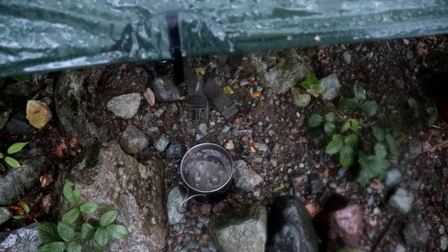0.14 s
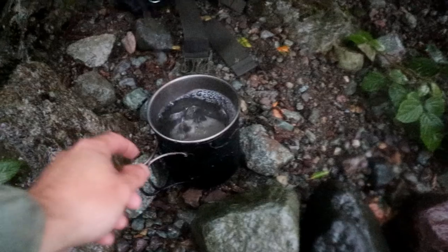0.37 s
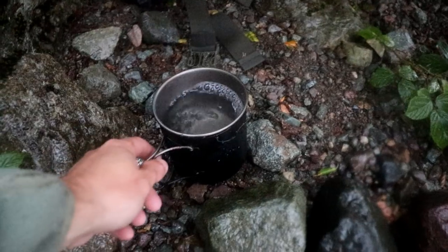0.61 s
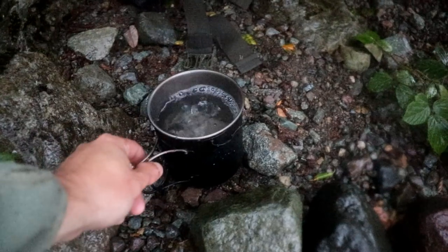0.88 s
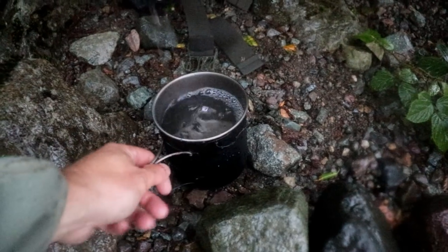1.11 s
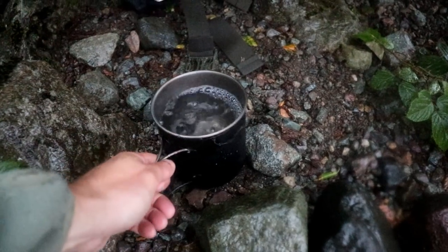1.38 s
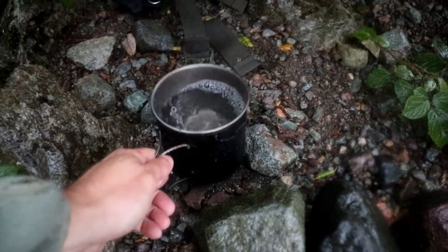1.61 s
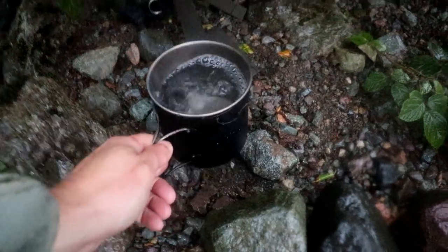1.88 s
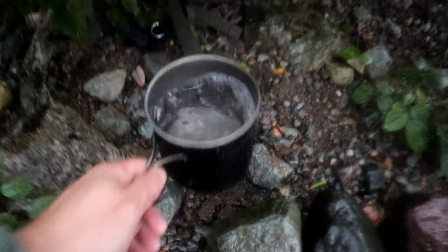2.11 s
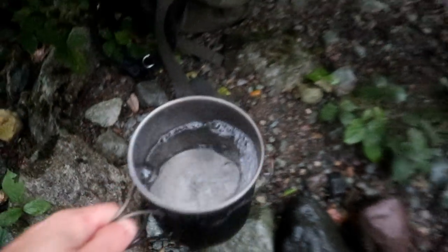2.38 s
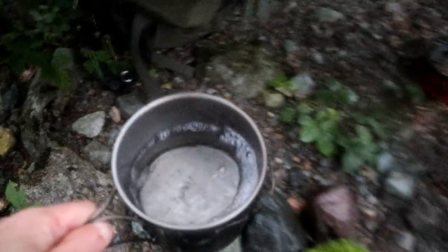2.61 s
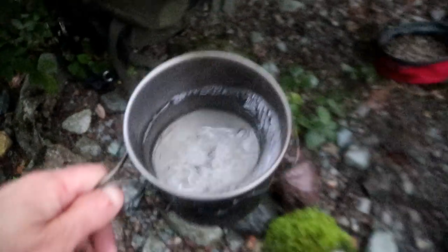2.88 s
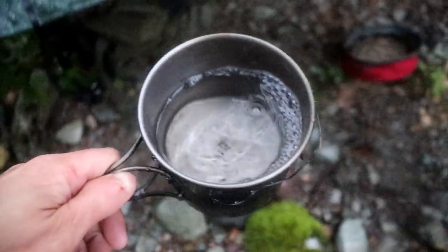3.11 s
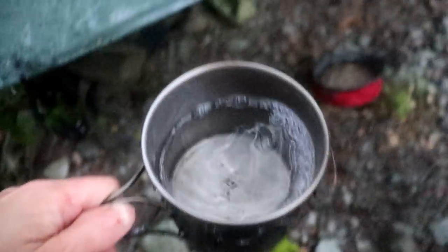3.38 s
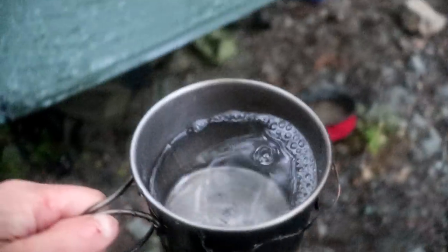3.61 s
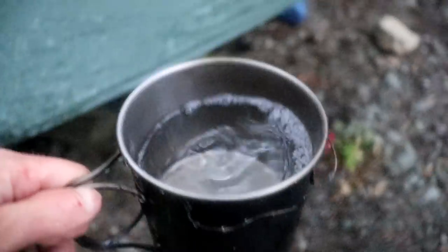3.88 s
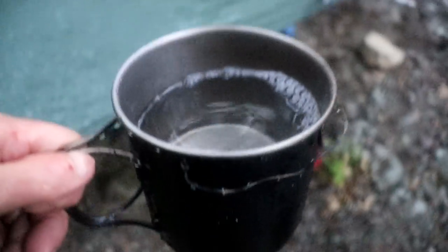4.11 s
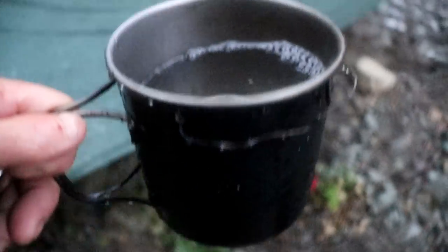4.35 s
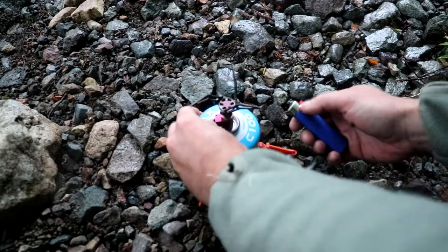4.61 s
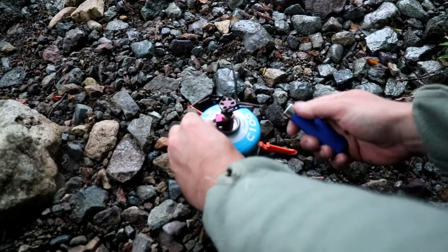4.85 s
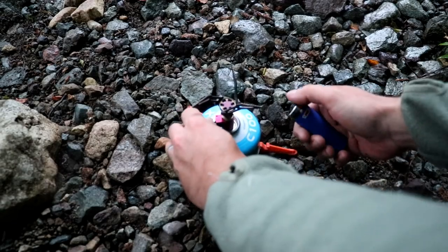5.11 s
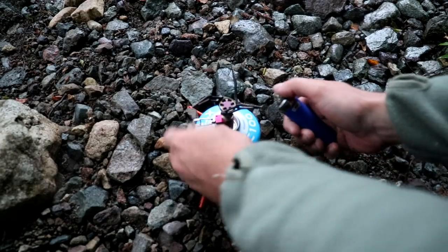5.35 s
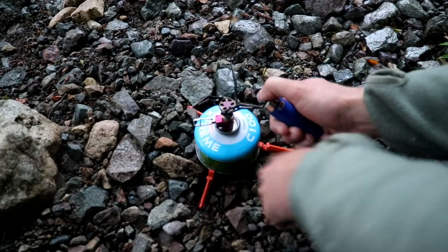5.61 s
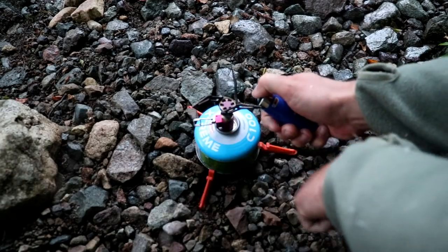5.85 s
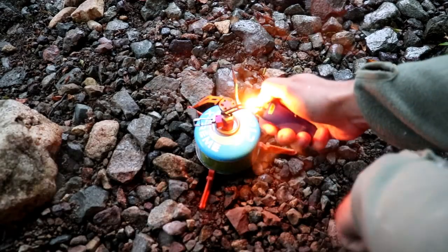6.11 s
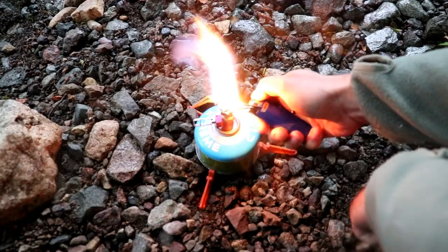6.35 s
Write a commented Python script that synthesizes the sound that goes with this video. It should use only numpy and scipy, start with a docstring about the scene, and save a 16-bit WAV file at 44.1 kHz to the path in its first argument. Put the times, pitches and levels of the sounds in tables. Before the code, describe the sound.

Outdoors, dry and close to a single microphone: dense rain patter over a soft rush, dull sheet thumps, crisp slaps and bright ticks, with faint rim notes from a water-filled pot. Then a sudden cut to a calmer place with only sparse drops. A camping burner begins a high, steady hiss, a lighter rasps once, and ignition lands as a deep puff followed by a low flame rush.

```python
"""Close under a tarp in steady rain: a rush of far patter, air rumbling low, wind on the one microphone.
Fat drops slap the fabric overhead, small ones tick on hard ground; bubbles and rim notes come from a pot.
Then a quieter spot, the rain further off: at 5 s a gas valve opens, whistling and hissing through a burner;
at 6 s a lighter wheel scrapes, and near 6.4 s the gas pops alight and roars.
Rush and hiss are shaped noise, drops are noise bursts through resonances, bubbles are gliding sines."""
import sys
import numpy as np
from scipy import signal
from scipy.fft import rfft, irfft, next_fast_len
from scipy.io import wavfile
from scipy.ndimage import uniform_filter1d, map_coordinates

SR = 44100
rng = np.random.default_rng(int(sys.argv[2]) if len(sys.argv) > 2 else 0)


def volts_from_db(level):
    """Convert decibel levels to linear amplitude ratios."""
    exponent = np.asarray(level, float) / 20
    return 10 ** exponent


def transcribe(u):
    """Save the signal u as a 16-bit wav file named by the first command-line argument.

    u: samples, shape (n,) or (channels, n), limited to [-1, 1]; the rate is SR.
    q: integer samples, one column per channel.
    """
    v = np.clip(np.atleast_2d(u).T, -1, 1)
    q = np.round(v * 32767).astype(np.int16)
    wavfile.write(sys.argv[1], SR, q)


N = 285768  # samples, 6.48 s

# All spectra below are relative: each noise is brought to rms 1 before its level is set.
# steady rain, close under the tarp and then further off at the stove: time_s, level_db
RAIN_LEVEL = [(0, -39.5), (2.6, -39), (3.5, -38.5), (3.96, -35.5), (4.53, -39), (4.55, -52), (4.62, -48),
              (5.05, -49)]
# colour of the far rain: frequency_hz, density_db_per_hz
PATTER_SPECTRUM = [(59, -59), (100, -3.5), (163, -21), (502, 3.5), (621, -3), (1360, -2), (2000, -6.5),
                   (6290, -8), (13200, -22.5), (16000, -34)]
# slow air moving past the tarp: time_s, level_db
AIR_LEVEL = [(0, -49), (.45, -47.5), (.67, -33), (.96, -53), (1.36, -45), (1.77, -52), (2.2, -44.5),
             (2.86, -41), (3.15, -48), (3.9, -41), (4.3, -41), (4.53, -49), (4.62, -69), (5.05, -83)]
# colour of that air: frequency_hz, density_db_per_hz
RUMBLE_SPECTRUM = [(15, -29), (26, 4), (45, -4), (65, -31), (90, -58)]
# gusts on the microphone: peak_s, level_db, rise_s, hold_s
WIND_GUSTS = [(0.602, -48, .1, 0.062), (1.07, -33, .06, 0.016), (1.494, -48, 0.14, 0.23),
              (2.375, -40, .02, 0.43), (2.865, -33.5, 0.066, 0.056), (3.002, -43, .05, .06)]
# colour of the gusts: frequency_hz, density_db_per_hz
BUFFET_SPECTRUM = [(30, -8), (60, -4.5), (125, -4.5), (220, -8.5), (360, -42), (700, -51)]
# fat drops on the tarp, levels are energies: start_s, thump_db, slap_db, spray_db, spread_ms
FAT_DROPS = [(.017, -3, -2.5, -12, 2.4), (0.0428, -29, 0, -12, 0.61), (.1963, -18, -22, -21, 1.1),
             (0.216, -35, -14, -17, 1.6), (.261, -27, -7, -11, 1.5), (.3053, -28, -10, -23, 2.6),
             (0.3173, -8.5, -14, -11, 4.2), (0.4571, -9, -7, -24, 2.4), (.464, -10, -4, -21, 2.6),
             (0.4888, -5, -2.5, -7, 3.7), (0.4981, -6, -1, -20, 3.3), (0.5418, -2.5, -0.5, -11, 3.5),
             (0.5732, -5, -3, -0.5, 2.7), (0.6187, -24, -3.5, -29, 1.9), (0.6579, -3, -0.5, -7, 4),
             (.666, -24, -22, -5.5, 5.7), (0.6831, 5.5, 2.5, -7, 4.4), (0.7728, -14, -8, -18, 3.6),
             (0.8366, -10, -19, -15, 5.4), (0.935, 5, 5, -1, 0.46), (.9836, -14, -12, -8, 3.3),
             (1.0853, -20, -2, -9, 4.4), (1.0975, 0, 9, 1.5, 1.3), (1.128, -18, -3, -14, 2.8),
             (1.1351, -4, -5, -3.5, 4.2), (1.142, -15, -6, -9, 5.7), (1.1745, 10, 5, 8.5, 2.5),
             (1.208, -2.5, 7, -1.5, 2.9), (1.215, -12, -15, -12, 2.5), (1.3112, -8, -13, -8, 2.6),
             (1.3388, -5.5, -1.5, -6, 3.8), (1.357, -11, -1.5, -10, 1.6), (1.3908, -6, -24, -10, 1.9),
             (1.439, -6, 0, -1, 1.2), (1.4739, 7, 2, 2.5, 3.2), (1.491, -13, -24, -16, 1.4),
             (1.5284, -2, 0, -1.5, 3.5), (1.5443, 1.5, -8, -4, 2.7), (1.5693, -3, -2, -2.5, 4.9),
             (1.5981, -6, -5, -15, 4.4), (1.659, -12, -9, -14, 4.2), (1.7218, -23, -5, -5, 4.8),
             (1.7274, 2.5, 3.5, -2, 2), (1.781, -12, -10, -12, 2.8), (1.814, -6, -2.5, -8, 2.1),
             (1.821, 12, 6, 8, 1.9), (1.9088, -1, -3.5, -26, 0.87), (1.9946, -8.5, -8, -8.5, 3.1),
             (2.0198, -1, -3, -20, 1.7), (2.029, -12, -4, -10, 2.4), (2.129, 4, -0.5, 2, 0.9),
             (2.1544, -28, -6, -5, 1.3), (2.1738, -22, -6, -10, 2.1), (2.187, -1, 0, -3.5, 2.8),
             (2.1968, -12, -2, -10, 5.6), (2.2082, -5, -2, -6, 4.6), (2.228, 2, 5.5, 0.5, 2.7),
             (2.2385, -19, -6, -8, 5.1), (2.3462, -8.5, -8, -13, 2.2), (2.4977, -27, -9, -14, 6.9),
             (2.5436, -27, -9.5, -26, 1.8), (2.6135, -30, -11, -23, 3.4), (2.6631, -7.5, -5.5, -2.5, 3.2),
             (2.722, -7, -9.5, -7, 4.2), (2.7983, -7, 6, -2, 3.1), (2.8408, -5, -15, -8, 2.6),
             (2.8736, -21, -4, -15, 0.58), (2.89, -0.5, -3.5, -7, 5), (2.911, -2, -2, -5, 2.7),
             (2.9314, -22, -2, -7, 2), (2.9385, -12, -12, -6, .8), (2.957, -4.5, -9, -4, 0.97),
             (2.9854, -12, -13, -28, 3), (3.1151, -7, -10, -9, 2.9), (3.2, -12, -7, -13, 2.6),
             (3.2362, -23, -11, -13, 1.1), (3.265, -12, -12, -11, 2.6), (3.2725, -12, -6.5, -9, 2.5),
             (3.2996, -24, -5.5, -20, 1.3), (3.3253, -7, -9, -26, 1.2), (3.3777, -32, -5.5, -12, 1),
             (3.397, -20, -11, -16, 1.7), (3.4125, -10, -2.5, -11, 5), (3.4488, -18, -9, -13, 2.8),
             (3.4813, -14, -9, -14, 4.8), (3.505, -7, -9, -14, 3.8), (3.517, -15, -10, -7.5, 1),
             (3.5974, -18, -10.5, -21, 4.1), (3.708, 8, -2.5, -2.5, 2.3), (3.7535, -19, -13, -15, 3.5),
             (3.7672, -23, -7, -17, 2.7), (3.787, -5, -3, -9, 3.9), (3.7963, 2, 4.5, 2.5, 0.77),
             (3.8724, -30, -5, -12, 2.5), (3.8923, 7.5, 9.5, 2, 2.4), (3.9335, 1.5, 6.5, -2.5, 2),
             (3.9546, -8, -13, -8, 2.5), (3.9628, -11, -6, -16, 2.4), (3.9873, -29, -8, -11, 2.6),
             (4.0125, -3.5, -4, -11, 1.6), (4.0811, 0.5, -20, -1.5, 1.8), (4.087, -6, -2, -8, 4.4),
             (4.1024, -24, -8, -23, 1.7), (4.157, -23, -2.5, -2.5, 1.9), (4.164, -18, -6, -6, 2.5),
             (4.221, -29, -9, -10, 2.3), (4.2291, -2.5, 3, 0.5, 2.4), (4.2971, -6.5, -11, -20, 3.6),
             (4.3101, -20, -7, -16, 2.7), (4.3247, -5.5, -4, -7, 2), (4.3595, -17, -7, -12, 3.2),
             (4.381, -26, -10, -16, 2), (4.4204, -2, -7.5, -18, 1.4), (4.44, -11, -10, -23, 1.8),
             (4.453, -4.5, -8, -15, 4.8), (4.483, -16, -10, -11, 3.4), (4.4986, 3.5, 1.5, 2.5, 2.4),
             (4.531, 10.5, 3.5, 1, 1.2), (4.5865, -14, -17, -25, 1.8), (4.6107, -11, -11, -10, 4.1),
             (4.6458, -17, -18, -19, 4.3), (4.5966, -20, -15, -23, 2.5), (4.6596, -17, -18, -31, 3.9),
             (4.83, -16, -21, -33, 1.8), (4.931, -32, -19, -24, 2.5), (4.9907, -21, -19, -26, 1.5),
             (4.8956, -8.5, -10.5, -17, 4.2), (4.981, -11.5, -13, -21, 1.5),
             (5.0687, -7.5, -16, -13.5, 3.8), (5.1247, -14, -9, -23, 2.8), (5.26, -14, -18, -24, 2.5),
             (5.3544, -13, -7, -19, 3), (5.4062, -11, -13, -14, 6.3), (5.6934, -13.5, -10, -17, 4.2),
             (5.7486, -2, -9.5, -9, 2.6), (5.7637, -16, -22, -25, 2.5), (5.869, -11.5, -14, -19, 2.6),
             (6.1808, -13.5, -19, -29, 2.6), (6.2188, -12.5, -19, -28, 2), (6.2524, -14, -19, -23, 1.3),
             (6.359, -12, -12, -7, 2.7)]
# walking along under the tarp, the fabric overhead is slack, then taut; each drop strays from this:
# time_s, sheet_pitch_hz
SHEET_PITCH = [(0, 324), (1.2, 320), (2.2, 313), (2.7, 395), (3.7, 405), (4.5, 352), (5.2, 386),
               (6.48, 412)]
# Resonances of a landing; ring() passes through them twice.
# the whole sheet: centre_in_sheet_pitches, width_in_sheet_pitches, one_pass_level_db
THUMP_MODES = [(0.497, 0.48, 0.5), (1.4, 0.74, 1.5)]
# the struck patch, before random tuning: centre_hz, width_hz, one_pass_level_db
SLAP_MODES = [(814, 1010, 4.5), (2170, 3170, 0.5)]
# the bursting drop, before random tuning: centre_hz, width_hz, one_pass_level_db
SPRAY_MODES = [(3000, 3000, 0), (6300, 4000, -1), (12000, 4000, -7)]
# small drops ticking on stone, leaf and metal (tick() shortens the spread a little):
# start_s, pitch_hz, energy_db, spread_ms
GROUND_TICKS = [(.236, 8660, -16, 1.1), (0.2672, 13150, -2.5, .5), (0.4955, 12900, -14, .8),
                (0.535, 8950, -12, 2.3), (.6378, 8400, -15, 1), (.6676, 8500, -9, 1.6),
                (.8034, 8600, -11, 0.98), (.9149, 8800, -9, 1.2), (0.9165, 5720, 2, 4.4),
                (.9554, 5500, -9.5, 1.6), (.967, 9360, -12, 1.2), (1.063, 8300, -10, 2.2),
                (1.1216, 6400, -12, 1), (1.2786, 6100, -8, .6), (1.664, 8550, -14, 1.8),
                (1.7676, 5400, -7.5, .7), (1.4755, 6800, -1, 1.8), (1.8199, 7140, 2.5, 1.9),
                (1.9007, 8450, -10.5, 1.5), (2.0709, 5150, -14, 1.8), (2.09, 8850, -14, 1.1),
                (2.1146, 4100, -11, 1.4), (2.174, 7900, -3, 1.3), (2.3002, 9050, -11, 1.3),
                (2.4469, 8100, -14.5, 1.1), (2.6618, 9900, -14, 1.6), (2.7733, 12100, -17, 1.1),
                (2.952, 8100, -12, 0.88), (3.05, 4470, -10, 0.84), (3.093, 8450, -7.5, 1.1),
                (3.2851, 5200, -10, 0.4), (3.2939, 9500, -16, 1.2), (3.7005, 8500, -3.5, 1.1),
                (3.8441, 8600, -13, 1.1), (3.917, 8700, -7, 1.7), (4.0077, 8300, -12, 1.6),
                (4.2044, 4700, -11, 0.52), (4.2852, 4400, -13, 1.4), (4.332, 4480, -11, 1.1),
                (4.5047, 9150, -20, 1.8), (4.5183, 8900, -4, 1.8), (4.6417, 8900, -21, 2)]
# bubbles caught under drops in the pot, one list per bubble: time_s, pitch_hz, level_db
POT_BUBBLES = [
    [(.495, 836, -27), (.507, 880, -35), (.531, 1116, -25), (.555, 1184, -35.5), (.575, 1500, -41)],
    [(1.086, 1225, -17), (1.091, 1030, -15), (1.105, 1060, -25), (1.125, 1148, -31), (1.14, 1410, -35),
     (1.155, 2016, -45)],
    [(1.663, 683, -40), (1.685, 1098, -17), (1.699, 1330, -21.5), (1.717, 1420, -50)],
]
# drops ringing the rim of the pot: start_s, pitch_hz, peak_db before the decay
RIM_NOTES = [(.87, 2700, -36), (1.265, 2700, -34), (3.94, 4800, -35), (4.085, 4800, -42)]
# gas flow: valve opens, steady, the hand comes down with the lighter, the flame takes it:
# time_s, whistle_db before the flame fills the cavity
GAS_LEVEL = [(5.03, -65), (5.065, -47.5), (5.1, -51), (5.165, -32), (5.26, -28.5), (5.98, -29),
             (6.002, -38.5), (6.07, -30), (6.2, -32), (6.385, -36.5), (6.393, -43), (6.48, -41)]
# pitch of the valve cavity: time_s, pitch_hz
WHISTLE_PITCH = [(5.03, 5670), (5.13, 5560), (5.2, 5180), (5.95, 5084), (6.0, 5020), (6.48, 4920)]
# whistle of the open burner: hz_from_centre, density_db_per_hz
OPEN_WHISTLE = [(5, -2), (250, 2), (550, -5.5), (1000, -15), (1500, -43)]
# whistle with the hand beside it: hz_from_centre, density_db_per_hz
HAND_WHISTLE = [(5, -7), (150, 1.5), (400, -11), (800, -9), (1500, -34)]
# rush through the burner holes: frequency_hz, density_db_per_hz
JET_SPECTRUM = [(900, -7), (1500, -7), (2100, -0.5), (2750, 1.5), (3100, 0), (3700, -6), (4500, -1),
                (6300, -1), (7900, 2), (9200, -1.5), (10500, -11), (13000, -39.5)]
# the highest band of the gas hiss: frequency_hz, density_db_per_hz
TOP_HISS_SPECTRUM = [(9000, -31), (10600, -3), (11500, 2), (12100, 6), (12800, 0), (14000, -9),
                     (15800, -19)]
# the lighter wheel scrapes: time_s, level_db
FLINT_LEVEL = [(5.98, -42), (5.985, -20.5), (5.992, -20), (5.996, -50)]
# colour of the scrape: frequency_hz, density_db_per_hz
SCRAPE_SPECTRUM = [(300, -13), (1500, -15), (3000, -9), (4600, 7), (6000, -5), (9000, -6), (12500, -7),
                   (16000, -14)]
# the burning gas: time_s, level_db
FLAME_LEVEL = [(6.378, -64), (6.386, -24), (6.392, -20.5), (6.398, -25.5), (6.41, -24.5), (6.48, -23.5)]
# colour of the flame: frequency_hz, density_db_per_hz
ROAR_SPECTRUM = [(24, -50), (40, -24), (280, 1), (700, -7), (1000, -2), (1400, -10), (1750, -20),
                 (2500, -24), (3500, -38), (5000, -70)]


def unit(x):
    """Scaled to rms 1."""
    return x / np.sqrt(np.mean(x ** 2) + 1e-20)


def curves(rows, outside=None):
    """One value per sample for each column after the time."""
    s, *cols = np.transpose(rows)
    return [np.interp(np.arange(N) / SR, s, c, outside, outside) for c in cols]


def wobble(rate):
    """A smooth random curve, rate knots a second."""
    knots = rng.standard_normal(int(N * rate / SR) + 4)
    return map_coordinates(knots, [np.arange(N) * rate / SR])


def filtered(x, response):
    """x times a complex response of frequency."""
    size = next_fast_len(N + 8192)
    return irfft(rfft(x, size) * response(np.fft.rfftfreq(size, 1 / SR)), size)[:N]


def coloured(x, spectrum):
    """x shaped by (Hz, dB) points on a log frequency axis, at rms 1."""
    f, db = np.transpose(spectrum)
    return unit(filtered(x, lambda hz: volts_from_db(np.interp(np.log(hz + 1), np.log(f), db, -120, -120))))


def rush(spectrum, patchy_db):
    """Coloured noise whose gain varies in random patches of time and frequency."""
    z = signal.stft(rng.standard_normal(N + 512), nperseg=512)[2]
    field = uniform_filter1d(rng.standard_normal(z.shape), size=6, axis=0)
    field = uniform_filter1d(field, size=10, axis=1)
    patchy = signal.istft(z * volts_from_db(patchy_db * unit(field)), nperseg=512)[1][:N]
    return coloured(patchy, spectrum)


def rain_rush():
    """Far rain melts into a rush: patchy noise whose level flickers."""
    level_db = curves(RAIN_LEVEL)[0] + 0.8 * wobble(3) + 0.9 * wobble(15)
    return volts_from_db(level_db) * rush(PATTER_SPECTRUM, patchy_db=1.8)


def air_rumble():
    """Slow air moving past the tarp rumbles as deep noise."""
    level_db = curves(AIR_LEVEL)[0] + 1.1 * wobble(4.8)
    return volts_from_db(level_db) * rush(RUMBLE_SPECTRUM, patchy_db=2.7)


def gusts():
    """Each gust swells, holds and drops away over a constant calm."""
    fall_s, calm_db = 0.041, -66.5
    t = np.arange(N) / SR
    each = []
    for peak_s, db, rise_s, hold_s in WIND_GUSTS:
        rise = np.minimum(t - peak_s, 0) / rise_s
        fall = np.maximum(t - peak_s - hold_s, 0) / fall_s
        each.append(volts_from_db(db) * np.exp(rise - fall))
    return volts_from_db(calm_db) + np.max(each, axis=0)


def wind_buffet():
    """Wind buffets the microphone: low noise follows the gusts and flutters."""
    return gusts() * volts_from_db(2.5 * wobble(30)) * rush(BUFFET_SPECTRUM, patchy_db=2.0)


def resonances(f, modes):
    """Causal response of (centre, width, dB) resonances, alternating in sign."""
    total = 0
    for k, (centre, width, db) in enumerate(modes):
        damping = 1j * f * width
        total = total + (-1) ** k * volts_from_db(db) * damping / (centre * centre - f * f + damping)
    return total


def bursts(spread_ms, spiky, strike):
    """Spectra of landings: a sharp first strike, then ragged splashes that thin out."""
    t = np.arange(700) / SR
    spread_s = np.clip(spread_ms, 0.2, 8)[:, None] / 1000
    ragged = uniform_filter1d(rng.standard_normal((len(spread_s), len(t))), size=24, axis=1)
    noise = rng.standard_normal(ragged.shape) * np.exp(spiky * unit(ragged))
    splashes = (1 - np.exp(-t / 0.0004)) * (np.exp(-t / spread_s) + 0.18 * np.exp(-t / 0.0047))
    shape = splashes + strike * np.exp(-t / 0.00013)
    return rfft(noise * shape, 1024)


def ring(spectra, modes, scale, db):
    """Each landing twice through the modes, their pitches times scale, at the given energy."""
    f = np.fft.rfftfreq(1024, 1 / SR) / scale[:, None]
    rows = irfft(spectra * resonances(f, modes) ** 2)
    return volts_from_db(db)[:, None] * rows / np.linalg.norm(rows, axis=1)[:, None]


def laid(s, rows):
    """Rows of sound added at their times."""
    place = np.round(s * SR).astype(int)[:, None] + np.arange(rows.shape[1])
    return np.bincount(place.ravel(), rows.ravel(), N + rows.shape[1])[:N]


def tarp(s, hz, thump_db, slap_db, spray_db, spread_ms, spiky=0.52):
    """One blow drives sheet and patch while the drop sprays; every spot is tuned a little differently."""
    blow = bursts(spread_ms, spiky, strike=1.0)
    # the drop's weight shoves the sheet away at once: -1 is an impulse at first contact
    push = 0.85 * blow / np.abs(blow).mean(axis=1)[:, None] - 1
    burst = bursts(1.2 * spread_ms, spiky, strike=2.5)  # the drop shatters mostly on first contact
    patch_tune, spray_tune = np.exp(0.14 * rng.standard_normal((len(s), 2))).T
    thump = ring(push, THUMP_MODES, hz, thump_db)
    slap = ring(blow, SLAP_MODES, patch_tune, slap_db)
    spray = ring(burst, SPRAY_MODES, spray_tune, spray_db)
    return laid(s, thump + slap + spray)


def tick(s, hz, db, spread_ms):
    """A hard surface answers with one high resonance, the narrower the longer it lasts."""
    width = (0.37 / spread_ms)[:, None]  # as a fraction of hz
    landing = bursts(0.87 * spread_ms, spiky=0.18, strike=0.46)
    return laid(s, ring(landing, [(0.91, width, 0)], hz, db))


def scattered(count, steep_db):
    """Random times with energies that follow the rain: many small, a few big."""
    when, size, spread = rng.random((count, 3)).T
    s = when * (N - 1) / SR
    rain_db = curves(RAIN_LEVEL)[0][(s * SR).astype(int)]
    return s, rain_db - steep_db * np.log(1 - 0.93 * size), spread


def small_drops():
    """Lesser drops all over the tarp and the ground, at random times, pitches and sizes."""
    s, db, spread = scattered(count=900, steep_db=2.0)
    tone = rng.standard_normal((len(s), 4)).T
    thump_db, slap_db, spray_db = db + 2.9 * tone[:3] + [[14], [16], [15]]
    sheet_hz = 340 * np.exp(0.37 * tone[3])
    on_tarp = tarp(s, sheet_hz, thump_db, slap_db, spray_db, 1.9 + 3.3 * spread)
    s, db, spread = scattered(count=3000, steep_db=2.0)
    hz = np.clip(4500 * np.exp(0.564 * rng.standard_normal(len(s))), 800, 15000)
    tick_db = db + 14.0 - 2.7 * np.log2(hz / 4500)  # higher ticks are weaker
    return on_tarp + tick(s, hz, tick_db, 0.48 + 1.9 * spread)


def fat_drops():
    """The drops that stand out: heavy ones move more fabric, so the sheet sounds lower."""
    s, thump_db, slap_db, spray_db, spread_ms = np.transpose(FAT_DROPS)
    heavy = -0.0075 * np.maximum(thump_db, -12)  # change of log pitch, per dB of thump
    spot = heavy + 0.18 * rng.standard_normal(len(s))
    hz = np.interp(s, *np.transpose(SHEET_PITCH)) * np.exp(spot)
    return tarp(s, hz, thump_db, slap_db, spray_db, spread_ms)


def ground_ticks():
    """Small drops that stand out on stone, leaf and metal, each a short high resonance."""
    return tick(*np.transpose(GROUND_TICKS))


def bubbles():
    """A bubble sings higher as it nears the surface: a sine on a gliding pitch."""
    out = np.zeros(N)
    for rows in POT_BUBBLES:
        hz = curves(rows)[0]
        db = curves(rows, outside=-120)[1]
        fade = uniform_filter1d(volts_from_db(db), size=60)
        out += np.sqrt(2) * fade * np.sin(2 * np.pi * np.cumsum(hz) / SR)
    return out


def rim():
    """A thin metal note, soon damped by the water."""
    t60_s = 0.14
    s, hz, db = np.transpose(RIM_NOTES)
    t = np.arange(SR // 10) / SR
    decay = volts_from_db(db[:, None] - 60 * t / t60_s)
    onset = 1 - np.exp(-t / 0.002)
    return laid(s, decay * onset * np.sin(2 * np.pi * hz[:, None] * t))


def whistle(skirt):
    """A band of noise around the moving pitch of the valve cavity."""
    turn = 2 * np.pi * np.cumsum(curves(WHISTLE_PITCH)[0]) / SR
    return (coloured(rng.standard_normal(N), skirt) * np.cos(turn)
            + coloured(rng.standard_normal(N), skirt) * np.sin(turn))


def gas():
    """Gas whistles in the valve cavity and rushes through the burner holes, its flow unsteady."""
    alight_s, alight_whistle_db = 6.39, -6  # the flame fills the cavity
    shade_s, shade_rush_db, shade_top_db = 6.255, -2, -8.5  # the hand screens the burner holes
    rush_db, top_db = -3, -7  # relative to the whistle before the flame
    t = np.arange(N) / SR
    shade = np.clip((t - shade_s) / 0.016, 0, 1)
    hand_s = FLINT_LEVEL[0][0]
    tone = np.where(t < hand_s, whistle(OPEN_WHISTLE), whistle(HAND_WHISTLE))
    tone = tone * volts_from_db(alight_whistle_db * (t > alight_s) + 0.69 * wobble(18))
    jet_db = rush_db + shade_rush_db * shade + 1.6 * wobble(9)
    jet = volts_from_db(jet_db) * rush(JET_SPECTRUM, patchy_db=1.3)
    hiss_db = top_db + shade_top_db * shade + 0.9 * wobble(20)
    top_hiss = volts_from_db(hiss_db) * rush(TOP_HISS_SPECTRUM, patchy_db=0.5)
    flow_db = curves(GAS_LEVEL)[0] + 0.62 * wobble(22) + 0.46 * wobble(70)
    return (t > GAS_LEVEL[0][0]) * volts_from_db(flow_db) * (tone + jet + top_hiss)


def flint():
    """The lighter wheel scrapes: a short, rough burst of bright noise."""
    level_db = curves(FLINT_LEVEL, outside=-120)[0] + 2 * wobble(1100)
    return volts_from_db(level_db) * coloured(rng.standard_normal(N), SCRAPE_SPECTRUM)


def flame():
    """The burning gas roars: low noise with a fast flutter."""
    t = np.arange(N) / SR
    level_db = curves(FLAME_LEVEL)[0] + 1.9 * wobble(110)
    return (t > FLAME_LEVEL[0][0]) * volts_from_db(level_db) * rush(ROAR_SPECTRUM, patchy_db=0.7)


def ignition():
    """The fireball pushes air out faster and faster, then the pressure swings back and dies away."""
    u = np.clip(np.arange(N) / SR - 6.392, -0.05, 0.05)  # seconds from the peak
    growth = np.exp(-np.abs(u) / 0.0025)
    swing = np.cos(np.pi * u / 0.0042) * np.exp(-np.abs(u) / 0.0055)
    return volts_from_db(-11) * np.where(u < 0, growth, swing)


def scene():
    """Everything reaches one microphone."""
    weather = rain_rush() + air_rumble() + wind_buffet()
    drops = small_drops() + fat_drops() + ground_ticks()
    pot = bubbles() + rim()
    stove = gas() + flint() + flame() + ignition()
    return (weather + drops + pot + stove)[None]


def band_limit(x):
    """A steep low-pass at the top of the band."""
    return signal.sosfilt(signal.butter(12, 16520, fs=SR, output="sos"), x)


def record(dry):
    """Soft clipping of the loudest drops, then a band limit at 15.8 kHz."""
    clipped = dry[0] / (1 + np.abs(dry[0] / 0.95) ** 6) ** (1 / 6)
    limited = filtered(clipped, lambda hz: hz < 15800)
    return band_limit(limited[None])


dry = scene()
out = record(dry)
transcribe(out)
```